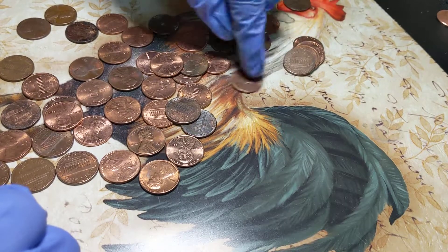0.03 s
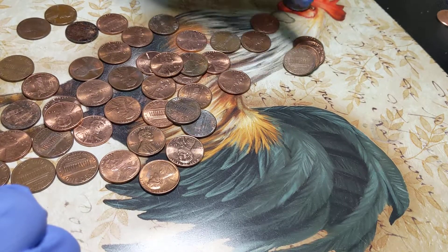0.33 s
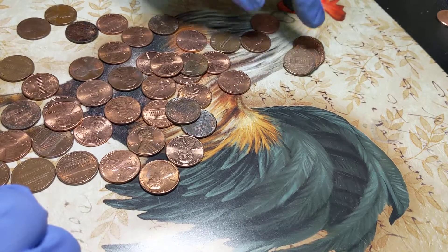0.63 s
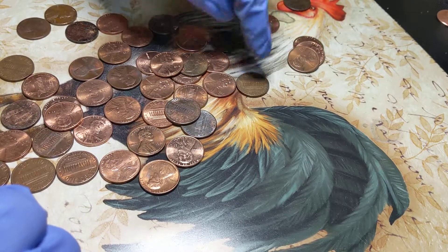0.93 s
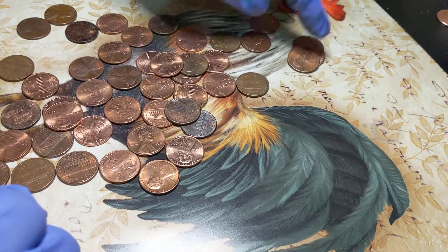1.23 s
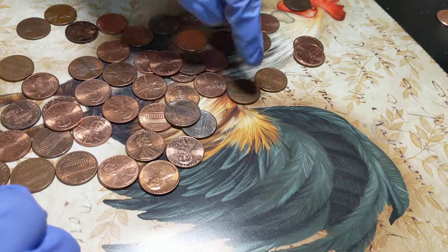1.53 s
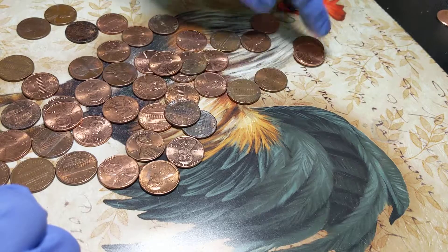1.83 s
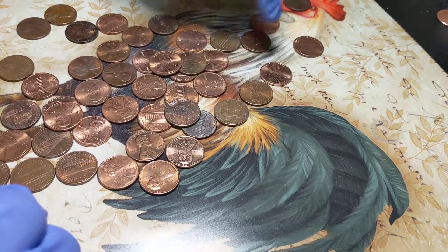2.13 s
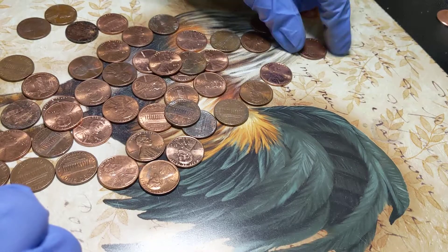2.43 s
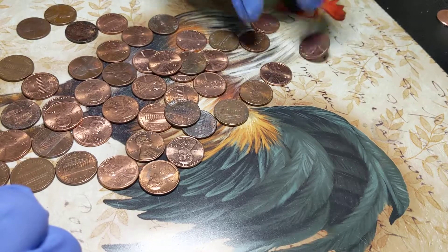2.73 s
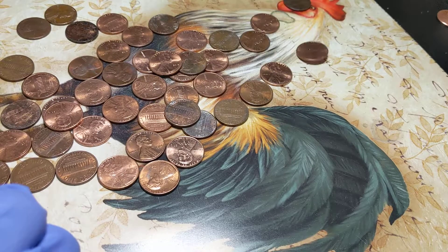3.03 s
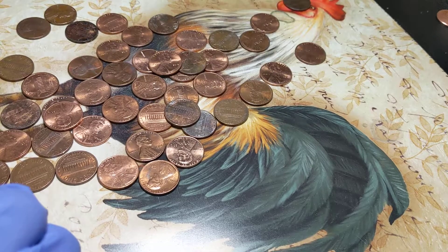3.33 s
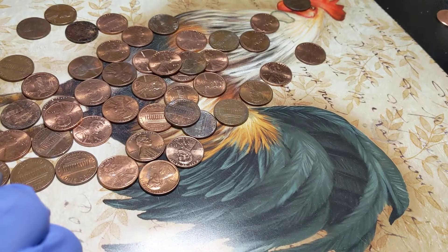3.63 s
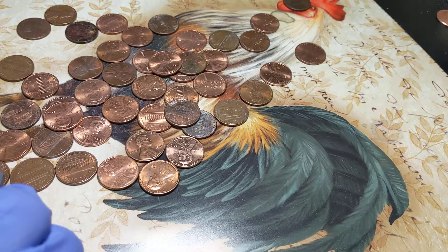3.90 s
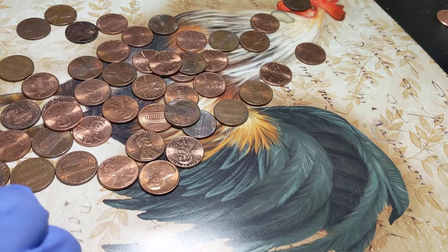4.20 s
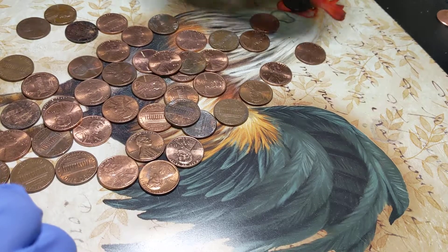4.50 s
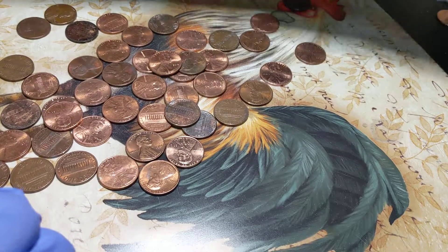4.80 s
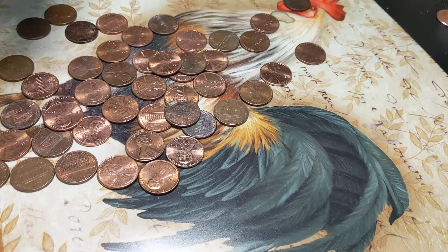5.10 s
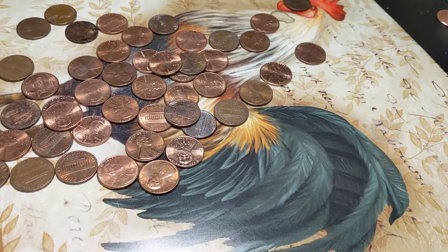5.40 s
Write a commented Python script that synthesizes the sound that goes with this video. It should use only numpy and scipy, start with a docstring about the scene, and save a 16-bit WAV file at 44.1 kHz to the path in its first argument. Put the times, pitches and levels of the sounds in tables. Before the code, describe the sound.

Coins are placed on a thin mat on a table, heard close up in a small room over faint ventilation hum and hiss. At about 0.1, 0.9, 1.45 and 2 seconds come quick clusters of bright metallic clicks, each with a short gritty scrape and a light, hollow knock through the mat, some leaving a thin high ring. A soft bump and a faint glove brush follow around 2.5 seconds. At about 2.8 seconds a coin drops and rocks in quickening, fading wobbles, settling by 3.4 seconds. From 3.9 to 4.4 seconds there are only faint glove rubs and a couple of tiny ticks. At about 4.9 seconds a few coins clash in a pile, the loudest moment, a short clacking jingle with glassy high pings. Two faint glove brushes follow around 5.4 seconds.

```python
"""A small quiet room, close to a table with a thin mat, where copper coins are laid one by one.
Each clicks and slides against its neighbours and knocks the table through the mat; a coin left free
for a moment sings a thin note. A gloved hand brushes softly over them, and one coin drops and rocks
itself to rest. Near the end a few coins clash in a pile off to one side. Ventilation hums underneath."""
import sys
import numpy as np
from scipy import signal
from scipy.fft import rfft, irfft, next_fast_len
from scipy.io import wavfile
from scipy.ndimage import map_coordinates

SR = 44100
rng = np.random.default_rng(int(sys.argv[2]) if len(sys.argv) > 2 else 0)


def persist_wave(psi):
    """Save psi, clipped to +-1, as 16-bit WAV."""
    counts = np.round(np.clip(psi, -1, 1) * 32767).astype(np.int16)
    wavfile.write(sys.argv[1], SR, np.atleast_2d(counts).T)


N = 244755
SIZE = 16384  # samples in one hit, room tail included
T = np.arange(SIZE) / SR
HZ = np.fft.rfftfreq(SIZE, 1 / SR)


def amp(db):
    """Decibels to gain."""
    return 10 ** (np.asarray(db) / 20)


def burst(x, length=0.0018):
    """Scale to the energy of rms 1 held for length seconds."""
    return x * np.sqrt(length * SR / (np.sum(x ** 2) + 1e-20))


def along(points, hz):
    """Read a curve of (Hz, value) points on a log frequency axis."""
    f, value = np.transpose(points)
    return np.interp(np.log(hz + 1), np.log(f + 1), value)


def wobble(rate):
    """A smooth random drift, rate knots a second."""
    knots = rng.standard_normal(int(N * rate / SR) + 4)
    return map_coordinates(knots, [np.arange(N) * rate / SR])


def colour(x, eq, pitch=1):
    """Give a short sound a body: a minimum-phase EQ, transposed by the ratio pitch."""
    cepstrum = irfft(np.log(amp(along(eq, HZ / pitch))))
    cepstrum[1:SIZE // 2] *= 2
    cepstrum[SIZE // 2 + 1:] = 0
    return irfft(rfft(x) * np.exp(rfft(cepstrum)))


def ring(modes, detune, spread_db):
    """Damped modes, at new strengths and slightly new pitches for each blow."""
    return sum(amp(db + spread_db * rng.normal() - 60 * T / t60)
               * np.sin(2 * np.pi * hz * (1 + detune * rng.normal()) * T) for hz, db, t60 in modes)


def grains(rate):
    """Tiny impacts at random moments, rate a second, over a faint rub."""
    return rng.standard_normal(SIZE) * ((rng.random(SIZE) < rate / SR) + 0.11)


def add(out, start, x):
    """Mix x, faded at its far end, into out from start seconds."""
    i = max(round(start * SR), 0)
    fade = np.clip(2 - 2 * T / T[-1], 0, 1) ** 2
    out[:, i:i + SIZE] += (x * fade)[..., :max(N - i, 0)]


# Early reflections off near surfaces: delay/s, level/dB against the tail
REFLECTIONS = [(.0068, -4), (.0085, -7), (0.0112, -7.5), (0.015, -14.5)]
# Decay of the room's tail: f/Hz, t60/s
ROOM_DECAY = [(200, 0.27), (1400, 0.23), (4000, 0.28), (10000, 0.26), (15000, 0.19)]


def place(x, pan_db, wet_db, alike, lag=0):
    """Set x in the room: +pan_db is left, lag delays the left (s), alike is the tail's mono share."""
    sides = np.array([[1], [-1]])
    direct = amp(sides * pan_db / 2) * np.exp(-1j * np.pi * HZ * lag * sides)
    early = np.zeros((2, SIZE))
    for delay, db in REFLECTIONS:
        arrival = delay + .0004 * rng.normal() + .00006 * rng.normal(size=2)  # paths vary with each hit
        early[[0, 1], np.round(arrival * SR).astype(int)] += amp(db)
    hz, t, bands = signal.stft(rng.standard_normal((3, SIZE)), SR, nperseg=256)
    decay = amp(-60 * t / along(ROOM_DECAY, hz)[:, None])
    noise = signal.istft(bands * decay, SR, nperseg=256)[1][:, :SIZE]
    bloom = 1 - np.exp(-(T / 0.006) ** 2)
    tail = (np.sqrt(1 - alike) * noise[:2] + np.sqrt(alike) * noise[2]) * bloom
    room = amp(wet_db + sides * pan_db / 3) * (early + tail / np.linalg.norm(tail[0]))
    return irfft(rfft(x) * (direct + rfft(room)))


# Rumble and hiss of the air: f/Hz, gain/dB
AIR_EQ = [(12, 1.5), (20, 3.5), (48, -5.5), (110, -11.5), (146, -20), (248, -21.5), (293, -20), (319, -23),
          (660, -27), (825, -23), (1660, -22), (1860, -27.5), (2530, -26), (5680, -28.5), (16000, -33.5)]
# Its stereo image, mono lows and wide highs: f/Hz, left-right correlation
AIR_IMAGE = [(30, 1), (120, 0.96), (300, 0.16), (1000, 0.057), (3000, 0.031), (12000, 0.014)]
# Ventilation tones: f/Hz, level/dB
VENT_TONES = [(35, -71), (72, -81), (120, -78), (243, -81), (840, -86)]


def room_tone(air_db=-60):
    """A bed of low rumble, soft hiss and wavering ventilation hum."""
    hz = np.fft.rfftfreq(N, 1 / SR)
    t = np.arange(N) / SR
    width = np.arccos(np.clip(along(AIR_IMAGE, hz), -1, 1)) / 2
    spectra = rfft(rng.standard_normal((2, N))) * amp(along(AIR_EQ, hz))
    mid, side = irfft(spectra * [np.cos(width), np.sin(width)], N)
    air = np.array([mid + side, mid - side])
    air /= np.sqrt(np.mean(air ** 2))
    hum = sum(amp(db + 1.1 * wobble(7.4)) * np.sqrt(2) * np.sin(2 * np.pi * f * t + 0.93 * wobble(14))
              for f, db in VENT_TONES)
    return amp(air_db + 0.92 * wobble(12)) * air + hum


# Coins meet each other and the mat, before trims: t/s, knock/dB, click/dB, metal ring/dB
COIN_HITS = [(0.0734, -49, -46, -36), (0.084, -32.5, -44, -42), (0.0925, -42, -44, -30.5),
             (0.108, -34, -52, -47), (0.1213, -29.5, -54, -43), (0.1278, -32, -60, -31),
             (0.843, -42.5, -40, -43), (0.8656, -43, -31.5, -45), (0.8812, -27, -38, -31.5),
             (0.89, -24.5, -46, -26), (0.925, -38.5, -52, -30), (0.95, -41.5, -41, -30),
             (1.4091, -47, -49, -53), (1.42, -36.5, -39.5, -40.5), (1.461, -29.5, -39, -35),
             (1.4634, -28.5, -26, -37), (1.475, -31, -40, -22), (2.0105, -37.5, -41, -52),
             (2.0188, -35, -35.5, -32.5), (2.0403, -23, -42, -44), (2.045, -41, -27.5, -25),
             (2.528, -47, -53, -63), (2.79, -29.5, -40.5, -47), (3.371, -43.5, -52, -62),
             (4.277, -70, -48, -71), (4.387, -63, -50, -46.5), (5.052, -47, -64, -64)]
# Hollow knock of the table and bright click of the edges: f/Hz, gain/dB
KNOCK_EQ = [(40, -15), (120, -6), (210, -21.5), (330, -8.5), (520, -16.5), (740, -19.5), (1050, -3),
            (1300, -7.5), (1630, 7.5), (1950, -3), (2280, -10), (2750, -6), (4000, -18.5), (12000, -29.5)]
CLICK_EQ = [(300, -31), (1500, -1), (2700, -1), (3350, 9), (4800, 5), (5700, 12.5), (6600, -1.5),
            (7600, 11), (8500, -8), (9400, 12.5), (11500, -3), (16000, 3.5)]
# Modes of a coin damped by the mat: f/Hz, level/dB, t60/s
COIN_MODES = [(12150, -3, .005), (12650, 1, .007), (13150, 1, .006), (13700, -1, .005), (14350, -3, .0045),
              (15000, -4, .004)]


def coin_hits(hits, knock_trim_db=-2, click_trim_db=-1.5):
    """Each contact knocks the table, snaps edge on edge and rings the damped metal."""
    out = np.zeros((2, N))
    touch = amp(-60 * T / .009)
    for start, knock_db, click_db, metal_db in hits:
        push = (T == 0) + 0.14 * rng.standard_normal(SIZE) * touch
        pitch = np.exp(0.058 * rng.normal())
        knock = amp(knock_db + knock_trim_db) * burst(colour(push, KNOCK_EQ, pitch))
        click = amp(click_db + click_trim_db) * burst(colour(grains(rate=11000) * touch, CLICK_EQ))
        chatter = grains(rate=5100) * touch  # the edges meet several times within milliseconds
        modes = ring(COIN_MODES, detune=.018, spread_db=2)
        metal = amp(metal_db) * burst(irfft(rfft(chatter) * rfft(modes)), length=.0013)
        add(out, start, place(knock, pan_db=3.5, wet_db=-7.5, alike=.5, lag=-69e-6))
        add(out, start, place(click + metal, pan_db=2.5, wet_db=-5, alike=.055, lag=99e-6 * rng.normal()))
    return out


# A coin slides over its neighbours: t/s, level/dB before trim, length/s
COIN_SLIDES = [(0.081, -42.5, 0.065), (0.846, -39.5, 0.05), (0.901, -46.5, 0.061), (1.423, -48, 0.038),
               (1.458, -39, 0.024), (2.015, -44, 0.0326)]
# Gritty scrape with a fizzy top: f/Hz, gain/dB
SCRAPE_EQ = [(400, -26), (1000, -1.5), (1650, 7), (2200, 3.5), (2750, 3.5), (3800, -2.5), (10500, -7.5),
             (13000, 5), (15000, 8), (16000, 6.5)]


def coin_slides(trim_db=-1):
    """A coin's face scrapes over other coins in a short spray of tiny impacts."""
    out = np.zeros((2, N))
    for start, db, length in COIN_SLIDES:
        friction = grains(rate=2000) * np.exp(-(T / length) ** 4)
        scrape = amp(db + trim_db) * burst(colour(friction, SCRAPE_EQ), length)
        add(out, start, place(scrape, pan_db=4, wet_db=-1, alike=.029))
    return out


def rim_catches(per_second=110, spread_db=1):
    """A sliding coin catches lightly, at random moments, on the rims it crosses."""
    balance_db = np.array([-9, -3.5, -2])  # knock, click and metal offsets from the slide's row
    hits = []
    for start, db, length in COIN_SLIDES:
        chance = rng.random((16, 4))
        delays = (np.arange(len(chance)) + chance[:, 0]) / per_second
        levels = db + balance_db + spread_db * (1 - 2 * chance[:, 1:])
        hits += list(np.column_stack([start + delays, levels])[delays < length])
    return coin_hits(hits)


# Thin, glassy pings: t/s, f/Hz, level/dB before trim, t60/s
COIN_PINGS = [(.8845, 12620, -25, .05), (.925, 12620, -34, .14), (1.475, 12620, -39, .09),
              (2.046, 12950, -41, .13), (4.885, 12550, -27, .12), (4.886, 12750, -27, .14),
              (4.942, 12910, -26, .17)]


def coin_pings(trim_db=-6):
    """A coin that is free for a moment sings on its lowest mode."""
    out = np.zeros((2, N))
    attack = 1 - np.exp(-T / 0.00066)
    for start, hz, db, t60 in COIN_PINGS:
        note = np.sin(2 * np.pi * hz * T) * amp(db + trim_db - 60 * T / t60) * attack
        add(out, start, place(note, pan_db=-3, wet_db=-9, alike=.1))
    return out


# Soft bumps on the table: t/s, level/dB
TABLE_BUMPS = [(0.89, -55), (1.466, -51.5), (2.041, -59.5), (2.529, -50), (4.889, -54.5)]
# The table's low modes: f/Hz, level/dB against the bump, t60/s
TABLE_MODES = [(30.7, -0.5, 1), (70.8, -6, 0.3), (129.6, 2, 0.14)]


def table_bumps():
    """Bumps set the table swaying: a dry, centred weight under the coins."""
    out = np.zeros((2, N))
    for start, db in TABLE_BUMPS:
        add(out, start, amp(db) * ring(TABLE_MODES, detune=.01, spread_db=1))
    return out


# Strokes of the gloved hand: peak t/s, level/dB before trim, length/s
GLOVE_STROKES = [(2.588, -65, 0.083), (3.887, -63, 0.033), (4.125, -66, 0.036), (4.276, -60.5, 0.034),
                 (4.383, -62, .035), (5.349, -63, 0.071), (5.446, -59.5, 0.022)]
# Airy rub of the glove: f/Hz, gain/dB
GLOVE_EQ = [(300, -7), (1500, 1), (3500, 3.5), (4700, 1.5), (5700, 8), (7000, -2), (11000, -5),
            (16000, 2.5)]


def glove_brushes(trim_db=-2, shimmer_db=-9):
    """The glove rubs over the coins, which ring with a faint shimmer."""
    out = np.zeros((2, N))
    for peak, db, length in GLOVE_STROKES:
        stroke = grains(rate=2500) * np.exp(-2 * (T / length - 2) ** 2)
        shimmer = irfft(rfft(stroke) * rfft(ring(COIN_MODES, detune=.02, spread_db=2)))
        rub = burst(colour(stroke, GLOVE_EQ), length) + amp(shimmer_db) * burst(shimmer, length)
        add(out, peak - 2 * length, amp(db + trim_db) * place(rub, pan_db=1, wet_db=-2, alike=.1))
    return out


# Mellow roll of a rim on the mat: f/Hz, gain/dB
RIM_EQ = [(100, -34), (400, -18), (740, -25), (1050, -8.5), (1300, -10.5), (1690, 4.5), (1950, -3),
          (2300, -11), (3300, -18), (5000, -27.5), (5650, -23.5), (6400, -38), (11300, -31.5),
          (11850, -23.5), (12400, -33)]


def rocking_coin(tip_s=2.737, rock_s=2.889, first_gap_s=.0755, gap_ratio=.897, roll_s=.0078):
    """A coin tips over its rim, then rocks in ever faster, weaker, longer rolls until it lies flat."""
    out = np.zeros((2, N))
    swing = np.arange(11)
    times = rock_s + first_gap_s * (1 - gap_ratio ** swing) / (1 - gap_ratio)
    levels_db = -44.5 - 0.93 * swing
    lengths = roll_s * (swing + 1) ** 0.42
    lead_s = .03  # time for each roll to swell to its peak
    for peak, db, length in [(tip_s, -46, roll_s), *zip(times, levels_db, lengths)]:
        contact = grains(rate=9000) * np.exp(-((T - lead_s) / (.6 * length)) ** 2)
        roll = amp(db) * burst(colour(contact, RIM_EQ, pitch=np.exp(.04 * rng.normal())), length)
        add(out, peak - lead_s, place(roll, pan_db=3.5, wet_db=-10, alike=.6))
    return out


# Clashes in the pile, before trim: t/s, clack/dB, jingle/dB, length/s
PILE_CLASHES = [(4.8834, -24.5, -16.5, 0.0079), (4.94, -36, -25.5, 0.012), (4.962, -36, -30, 0.021),
                (5.0, -43.5, -39, .034)]
# Hard clack, and the jingle of many coins each on its own note: f/Hz, gain/dB
CLACK_EQ = [(100, -7.5), (220, -22), (340, -11.5), (700, -21.5), (1100, -8), (1700, -5), (2700, 0.5),
            (3400, 2), (4800, -0.5), (5900, 3.5), (6800, 2.5), (7600, 5.5), (8400, -0.5), (16000, -4)]
JINGLE_EQ = [(2000, -46), (10700, -40), (11500, -4.5), (12200, -6), (12900, 2.5), (13700, -7), (15200, -11),
             (16000, -16.5)]


def coin_pile(trim_db=-1, rattle_db=-15, rattle_t60_s=.18):
    """Loose coins tumble in quick runs and rattle to rest; their high ring beams to the right."""
    out = np.zeros((2, N))
    attack = 1 - np.exp(-T / 0.001)
    rattle = amp(rattle_db - 60 * T / rattle_t60_s)
    for start, clack_db, jingle_db, length in PILE_CLASHES:
        tumble = np.exp(-(T / length) ** 4)
        run = grains(rate=11000) * (tumble + rattle) * attack
        clack = amp(clack_db + trim_db) * burst(colour(run, CLACK_EQ), length)
        jingle = amp(jingle_db + trim_db) * burst(colour(run, JINGLE_EQ), length)
        add(out, start, place(clack, pan_db=5.5, wet_db=-3, alike=.043, lag=.0002))
        add(out, start, place(jingle, pan_db=-5, wet_db=-5, alike=.11, lag=.00021))
    return out


def scene():
    """The stereo mix: coins, table and glove over the room tone."""
    return (room_tone() + coin_hits(COIN_HITS) + coin_slides() + rim_catches() + coin_pings()
            + table_bumps() + glove_brushes() + rocking_coin() + coin_pile())


def record(dry):
    """A steep high cut takes off the very top of the mix."""
    cutoff_hz, slope_width_hz = 15790, 200
    size = next_fast_len(N + SIZE)
    hz = np.fft.rfftfreq(size, 1 / SR)
    high_cut = np.clip((cutoff_hz - hz) / slope_width_hz + .5, 0, 1)
    return irfft(rfft(dry, size) * high_cut, size)[:, :N]


dry = scene()
out = record(dry)
persist_wave(out)
```